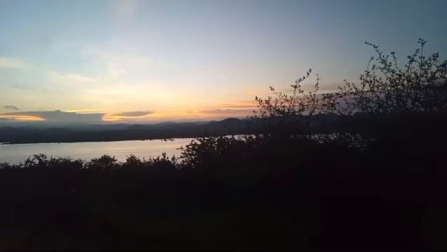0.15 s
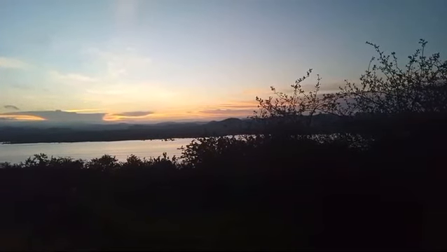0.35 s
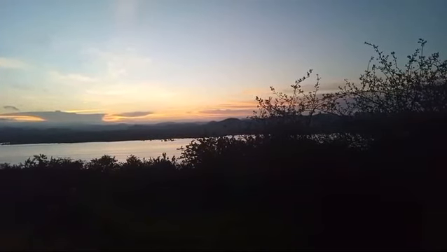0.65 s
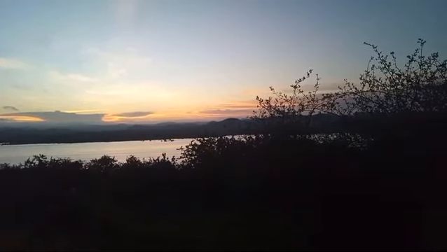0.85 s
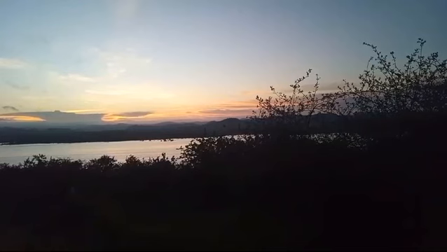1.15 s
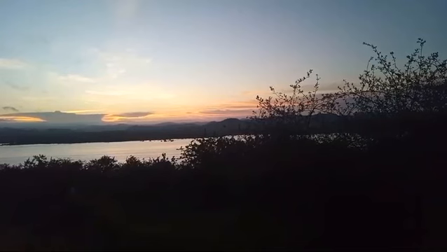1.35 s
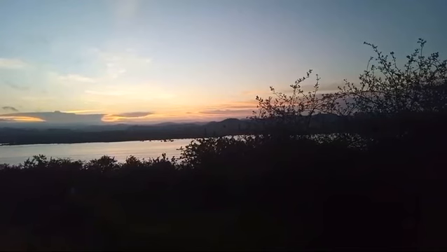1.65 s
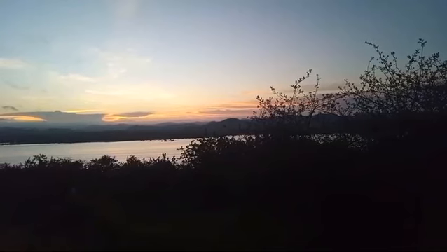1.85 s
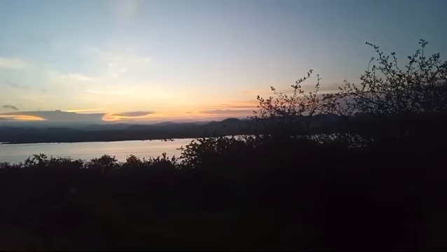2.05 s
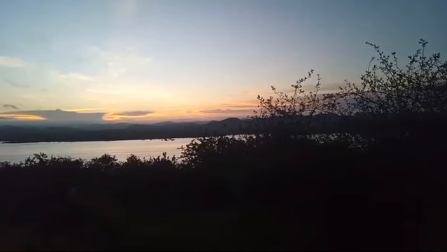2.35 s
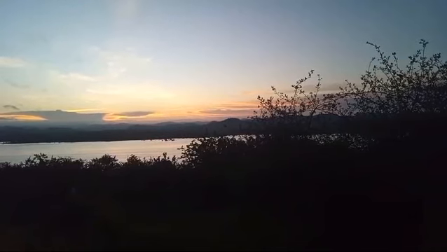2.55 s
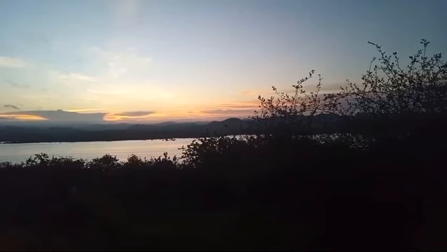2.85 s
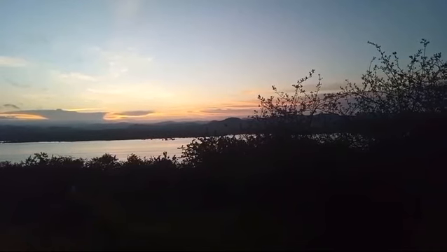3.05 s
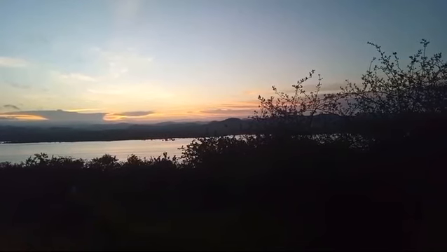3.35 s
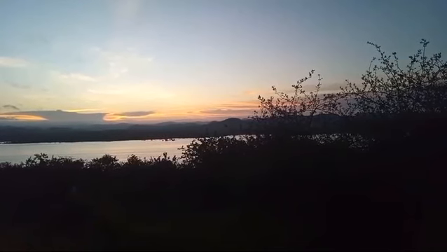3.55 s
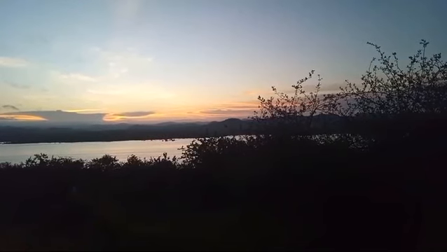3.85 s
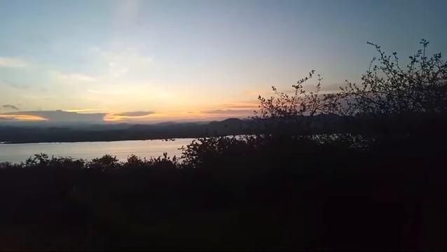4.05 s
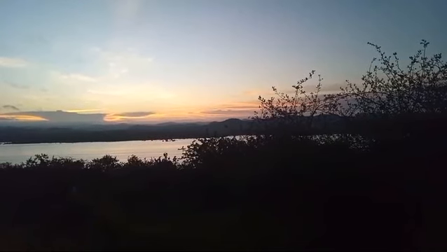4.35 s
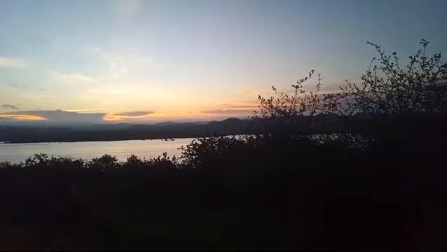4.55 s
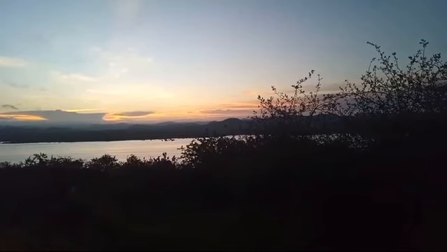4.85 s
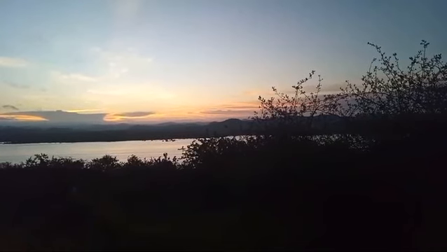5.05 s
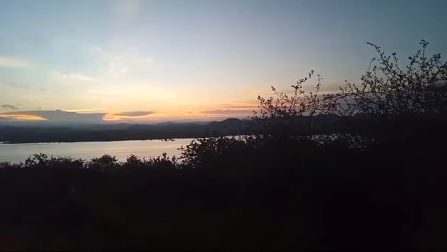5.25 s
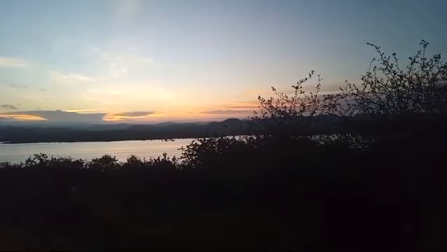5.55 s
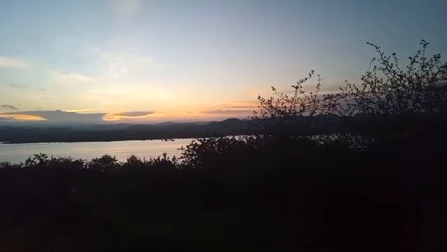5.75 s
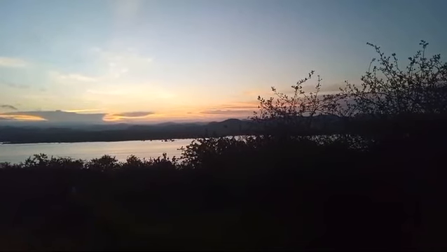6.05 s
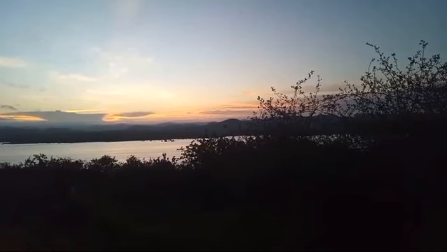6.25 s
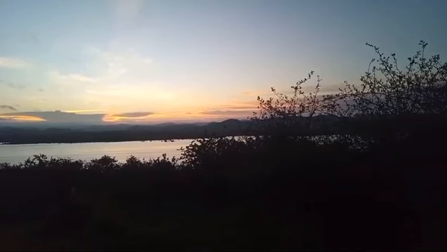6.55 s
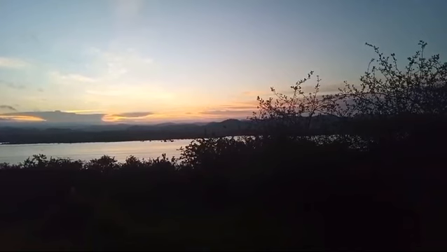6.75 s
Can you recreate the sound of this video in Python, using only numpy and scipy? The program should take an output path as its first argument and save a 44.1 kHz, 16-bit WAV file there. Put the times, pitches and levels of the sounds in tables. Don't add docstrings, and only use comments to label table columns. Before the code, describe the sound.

A small mono microphone on a bushy slope above a lake hears a dawn chorus, each call leaving a short scattered tail. At 0 s a near songbird finishes a falling whistle. From 0.3 to 1.25 s a fairly close rooster crows in broken, hoarse syllables, then holds a long note around 650-700 Hz, swelling, dipping, swelling again and cracking at 2.5 s. Birds thicken from 1.3 s: downward swoops, quick turns, low warbles, rasps and sharp chips, notably at 1.65 and 2.8 s. A faint rooster answers around 2.9-3.4 s, others fainter still. Two dull handling knocks fall at 3.7 and 3.9 s. A loud steep high whistle comes at 4.25 s, with thin high notes, then a lull. Chips, swoops and broad falling whistles return at 4.8-5.6 s. Softer low whistles thin out until 6.9 s over light wind, blurred distant chorus, low hum and a barely audible far lowing call.

```python
import sys
import numpy as np
from scipy import signal
from scipy.fft import rfft, irfft, next_fast_len
from scipy.io import wavfile
from scipy.ndimage import uniform_filter1d, map_coordinates

SR = 44100
rng = np.random.default_rng(int(sys.argv[2]) if len(sys.argv) > 2 else 0)


def gain_from_db(level_db):
    decades = np.asarray(level_db, float) / 20
    return 10 ** decades


def generate_wav(sig):
    pcm = np.round(np.clip(np.atleast_2d(sig).T, -1, 1) * 32767).astype(np.int16)
    wavfile.write(sys.argv[1], SR, pcm)


N = 304731

# (time [s], length [s], top [Hz], bottom [Hz], level [dB])
NEAR_FALLS = [
    (0, 0.055, 2424, 1504, -38.5),
    (5.093, 0.075, 3095, 1565, -35.5),
]
NEAR_ARCHES = [
    (5.195, .173, 2795, 1585, -41),
]
NEAR_RISES = [
    (.885, 0.1395, 7406, 6590, -52.5),
]
# (time [s], pitch [Hz], level [dB])
NEAR_EARLIER = [
    (-.06, 2547, -35),
    (-.03, 2874, -39.5),
    (.001, 2498, -36.5),
]
# (time [s], pitch [Hz], level [dB])
NEAR_PHRASES = [
    [(.842, 3050, -44), (.862, 2770, -42.5), (.88, 2200, -46), (.93, 2000, -45), (.995, 1600, -57)],
    [(1.652, 3250, -51), (1.672, 3400, -46.5), (1.7, 3270, -37.5), (1.724, 3040, -41.5),
     (1.742, 3170, -36.5), (1.75, 3200, -50)],
    [(1.733, 3530, -39), (1.742, 3724, -40.5), (1.752, 3760, -38), (1.763, 4170, -36.5), (1.785, 5220, -48),
     (1.8, 5280, -57), (1.85, 5170, -66)],
    [(2.525, 1600, -47), (2.61, 2546, -41.5), (2.626, 2200, -40.5), (2.64, 2550, -40), (2.652, 2100, -47.5),
     (2.675, 2744, -42), (2.7, 1720, -53.5), (2.73, 1680, -68)],
    [(3.283, 3310, -53), (3.312, 3113, -46), (3.328, 3450, -44), (3.345, 2958, -42), (3.358, 3970, -41),
     (3.375, 3170, -40), (3.545, 1712, -52)],
    [(4.243, 5300, -34), (4.262, 5350, -31), (4.288, 4460, -37.5), (4.305, 3250, -42), (4.325, 2806, -40.5),
     (4.35, 2600, -45), (4.362, 1890, -47.5)],
]


def near_bird():
    out = np.zeros(N)
    voice = dict(overtone_db=3, wet_db=-4, flutter_db=4.8)
    sing(out, NEAR_FALLS, lambda u: fall(u, drop_db=-24), **voice)
    sing(out, NEAR_ARCHES, lambda u: arch(u, drop_db=-13), **voice)
    sing(out, NEAR_RISES, lambda u: rise(u, drop_db=-9.5), **voice)
    sing_phrases(out, NEAR_PHRASES, overtone_db=3, wet_db=-8)
    sing_phrases(out, [NEAR_EARLIER], overtone_db=-10, wet_db=-3)
    return out


# (time [s], top [Hz], level [dB])
SWOOPS = [
    (1.341, 5215, -45),
    (3.043, 5196, -39),
    (5.047, 5255, -43),
    (5.565, 5094, -42.5),
]
# (time [s], pitch over top [ratio], level [dB])
SWOOP_SHAPE = [
    (0, .89, -19.5),
    (.016, 1, -2.5),
    (0.041, 0.97, 0),
    (0.114, .635, -12),
    (.143, .555, -11),
    (.165, .64, -16),
    (.18, .64, -28),
]


def swooping_bird():
    out = np.zeros(N)
    swoops = [[(s + t, top_hz * ratio, db + swell_db) for t, ratio, swell_db in SWOOP_SHAPE]
              for s, top_hz, db in SWOOPS]
    sing_phrases(out, swoops, overtone_db=-24, wet_db=-4)
    return out


# (time [s], length [s], top [Hz], bottom [Hz], level [dB])
ARCHES = [(1.82, 0.13, 2448, 1820, -48), (2.48, 0.04, 2094, 1690, -50.5), (3.625, 0.13, 2402, 1663, -52.5),
          (3.875, 0.055, 2250, 1760, -54.5), (5.452, 0.05, 2480, 1895, -50), (5.55, .12, 2486, 1900, -44.5),
          (6.405, 0.061, 2800, 2490, -77), (6.79, 0.11, 2936, 2440, -76.5)]
HELD = [
    (2.485, 0.027, 4710, 4340, -45.5),
    (2.682, 0.051, 4760, 4440, -56),
    (3.262, 0.03, 4790, 4730, -63),
    (3.543, 0.017, 2410, 2267, -49),
    (3.897, 0.034, 6100, 5900, -66),
    (1.858, 0.082, 4590, 4294, -49),
    (3.042, 0.021, 4830, 4690, -50.5),
    (4.785, 0.098, 2286, 2210, -76),
]
WARBLES = [
    (1.692, 0.073, 2485, 2050, -43.5),
    (2.054, 0.076, 2383, 1993, -44),
]
# (time [s], pitch [Hz], level [dB])
LOW_PHRASES = [
    [(5.778, 2470, -46), (5.79, 2360, -46.5), (5.812, 2060, -53.5), (5.84, 2340, -46), (5.852, 2200, -50),
     (5.868, 1840, -64)],
    [(5.905, 1720, -72), (5.935, 2166, -57), (5.98, 2198, -53), (6.01, 2170, -56), (6.025, 2060, -53.5),
     (6.055, 1820, -70)],
    [(6.195, 1600, -79), (6.218, 2010, -58), (6.232, 2100, -52.5), (6.255, 1794, -65.5),
     (6.285, 2044, -55.5), (6.3, 1945, -58), (6.315, 1800, -70)],
    [(6.348, 1960, -63), (6.367, 2305, -47), (6.382, 2090, -59), (6.395, 1790, -68), (6.43, 1620, -72)],
    [(2.175, 1690, -67), (2.205, 2136, -53), (2.27, 2140, -52), (2.3, 2080, -53), (2.325, 1850, -61)],
    [(3.292, 6450, -62), (3.32, 6200, -68), (3.355, 6950, -64), (3.385, 6350, -62), (3.425, 5600, -68)],
    [(6.14, 2700, -68), (6.148, 3420, -60), (6.165, 3350, -58), (6.185, 2650, -64)],
    [(3.322, 3040, -50), (3.345, 2953, -45.5), (3.372, 3020, -52)],
]


def low_bird():
    out = np.zeros(N)
    voice = dict(overtone_db=-23, wet_db=-8.5, flutter_db=3.5)
    sing(out, ARCHES, lambda u: arch(u, drop_db=-18.5), **voice)
    sing(out, HELD, lambda u: arch(u, drop_db=-20, lean=0.95, flat=0.28), **voice)
    sing(out, WARBLES, lambda u: warble(u, drop_db=-12.5), **voice)
    sing_phrases(out, LOW_PHRASES, overtone_db=-24, wet_db=-7)
    return out


# (time [s], pitch [Hz], level [dB])
HIGH_PHRASE = [
    (4.15, 6400, -68),
    (4.18, 7050, -57),
    (4.21, 7300, -53),
    (4.262, 6380, -46),
    (4.39, 7700, -55.5),
    (4.5, 7700, -73),
    (4.6, 7670, -76),
]


def high_bird():
    out = np.zeros(N)
    sing_phrases(out, [HIGH_PHRASE], overtone_db=14, wet_db=-4)
    return out


# (time [s], length [s], top [Hz], bottom [Hz], level [dB])
FALLS = [(1.765, 0.06, 3210, 1900, -60.5), (2.42, .035, 3700, 2700, -66), (2.1, 0.022, 4196, 3280, -61),
         (2.44, 0.016, 5600, 4700, -56), (2.453, .02, 4800, 3950, -48), (2.652, 0.038, 4180, 3350, -52.5),
         (3.105, 0.043, 2260, 2010, -72), (3.81, 0.066, 3620, 1920, -69), (5.03, 0.032, 2270, 1950, -68),
         (5.42, 0.059, 2896, 2000, -54), (3.357, 0.05, 2650, 2020, -60)]
RISES = [(.14, 0.33, 3590, 3100, -78.5), (2.063, 0.074, 5770, 4900, -52.5), (2.213, 0.08, 5780, 4850, -48),
         (2.373, 0.09, 5780, 4760, -49), (2.53, 0.073, 5740, 4550, -54.5),
         (2.738, 0.0292, 5400, 4400, -58.5), (3.963, .016, 9360, 6100, -65.5),
         (3.505, 0.015, 6920, 4500, -66.5), (3.3, 0.03, 5800, 4760, -64), (2.885, 0.045, 2920, 2550, -56.5),
         (2.945, 0.016, 5320, 4840, -54), (3.893, 0.021, 7560, 6560, -62.5),
         (3.293, 0.043, 2720, 1950, -61), (1.843, 0.024, 4260, 2700, -51), (4.47, 0.044, 6020, 5640, -78),
         (4.895, 0.059, 2944, 2615, -53)]
# (time [s], pitch [Hz], level [dB])
FAR_PHRASES = [
    [(1.482, 2200, -52), (1.505, 2650, -49), (1.525, 3150, -52), (1.548, 2400, -48), (1.565, 2216, -48.5),
     (1.615, 2183, -75)],
    [(4.125, 4170, -59), (4.135, 4880, -61.5), (4.165, 4850, -63), (4.175, 5440, -58), (4.19, 6200, -68)],
    [(4.188, 4150, -55), (4.198, 4730, -61), (4.213, 4900, -56), (4.24, 6300, -53)],
    [(4.2, 3080, -69), (4.22, 3186, -63), (4.235, 2740, -73), (4.26, 2580, -83)],
    [(2.88, 4240, -61.5), (2.905, 4040, -57), (2.93, 3900, -59)],
    [(3.52, 4180, -49), (3.528, 4680, -47.5), (3.54, 3924, -51), (3.56, 4080, -52), (3.575, 3820, -51),
     (3.592, 3750, -56), (3.615, 2720, -61.5)],
    [(3.915, 2070, -73), (3.95, 1485, -82), (4.005, 2074, -68.5), (4.07, 2103, -53), (4.1, 2050, -64.5),
     (4.125, 1670, -70)],
    [(3.97, 2590, -83), (4.0, 3170, -83), (4.03, 3355, -73), (4.09, 3430, -73), (4.17, 3330, -69)],
    [(4.255, 1604, -83), (4.285, 2080, -68), (4.312, 1856, -72), (4.35, 1890, -66)],
    [(4.405, 2060, -74), (4.42, 2246, -63), (4.45, 1797, -71), (4.53, 1393, -83)],
    [(2.557, 2950, -62), (2.58, 2880, -60), (2.595, 3380, -60), (2.62, 3300, -66)],
    [(4.165, 2750, -76), (4.19, 3470, -72), (4.2, 3400, -80)],
]


def far_birds():
    out = np.zeros(N)
    voice = dict(overtone_db=-12.5, wet_db=-1.5, flutter_db=5.7)
    sing(out, FALLS, lambda u: fall(u, drop_db=-4), **voice)
    sing(out, RISES, lambda u: rise(u, drop_db=-9), **voice)
    sing_phrases(out, FAR_PHRASES, overtone_db=-24, wet_db=-2)
    return out


# (time [s], length [s], top [Hz], bottom [Hz], level [dB])
HOOKS = [
    (1.212, 0.057, 3757, 2655, -59),
    (2.912, .052, 3820, 2780, -50.5),
    (4.928, 0.06, 3800, 2680, -52.5),
    (5.44, 0.045, 3744, 2720, -52.5),
]
PLATEAUS = [
    (1.997, 0.07, 3695, 2603, -58),
    (2.125, 0.073, 3730, 2800, -58.5),
    (2.253, 0.075, 3790, 2610, -60.5),
]
DIVES = [
    (3.976, 0.043, 9450, 3980, -58.5),
    (4.553, 0.049, 9600, 3920, -64),
]


def hidden_birds():
    out = np.zeros(N)
    voice = dict(overtone_db=-24, wet_db=2, flutter_db=4.4)
    sing(out, HOOKS, lambda u: hook(u, drop_db=-23.5), **voice)
    sing(out, PLATEAUS, lambda u: arch(u, drop_db=-7, lean=0.6, flat=0.49), **voice)
    sing(out, DIVES, lambda u: fall(u, drop_db=-13, bend=0.93), **voice)
    return out


# (time [s], peak level [dB], start [Hz])
CHIPS = [
    (1.1322, -46, 6190),
    (1.6435, -38.5, 6190),
    (2.831, -35.5, 5980),
    (4.845, -37.5, 6540),
    (5.3485, -41, 6630),
]


def chips():
    out, t = np.zeros(N), np.arange(int(0.038 * SR)) / SR
    for s, peak_db, top_hz in CHIPS:
        hz = np.interp(t, [0, 0.012, 0.018, 0.035], [top_hz, 4050, 4800, 5250])
        db = peak_db - 7 - 250 * np.minimum(t, 0.02)
        add(out, s, whistle(hz, db, overtone_db=-30, flutter_db=2), wet_db=2)
    return out


# (time [s], length [s], start [Hz], end [Hz], level [dB], overtones [dB])
RASPS = [
    (1.767, 0.059, 5310, 4910, -44.5, -11),
    (1.833, 0.034, 5090, 6270, -42.5, -13),
    (1.79, .08, 6900, 7100, -57.5, -30),
    (3.31, .1, 5590, 5020, -68, -21.5),
    (3.768, .07, 6100, 4350, -52.5, -36),
    (3.734, 0.088, 5340, 5118, -55, -32),
    (4.248, 0.12, 5420, 4590, -66, 6),
]


def rasps():
    out = np.zeros(N)
    for s, length_s, start_hz, end_hz, db, overtone_db in RASPS:
        n = int(length_s * SR)
        shake = 1 + 0.15 * np.tanh(wobble(n, 700))
        phase = turns(np.linspace(start_hz, end_hz, n) * shake)
        tone = np.sin(phase) + gain_from_db(overtone_db) * (np.sin(2 * phase) + 0.4 * np.sin(3 * phase))
        level = gain_from_db(db + 3 * np.tanh(wobble(n, 250)))
        add(out, s, faded(level * tone, 0.3 * length_s), wet_db=-3)
    return out


def sing(out, notes, shape, overtone_db, wet_db, flutter_db):
    for s, length_s, top_hz, bottom_hz, db in notes:
        height, swell_db = shape(np.linspace(0, 1, int(length_s * SR)))
        hz = bottom_hz + (top_hz - bottom_hz) * height
        add(out, s, whistle(hz, db + swell_db, overtone_db, flutter_db), wet_db)


def sing_phrases(out, phrases, overtone_db, wet_db):
    for phrase in phrases:
        s, (hz, db) = columns(phrase, round_s=0.0026)
        add(out, s, whistle(hz, db, overtone_db, flutter_db=4.5), wet_db)


# (frequency [Hz], level [dB])
OVERTONE_COLOUR = [(3000, -21), (5800, -45.5), (6450, -33), (7200, -44.5), (8300, -35.5), (10500, -22.5),
                   (12500, -32.5), (15000, -31)]


def whistle(hz, db, overtone_db, flutter_db):
    n = len(hz)
    phase = turns(hz * (1 + 0.0075 * wobble(n, 140)))
    tone = np.sin(phase)
    for k in range(2, 8):
        effort_db = 0.5 * (db + 42) + 5 * wobble(n, 110) - 2
        line_db = overtone_db + effort_db + along(OVERTONE_COLOUR, k * hz) - 2.1 * abs(k - 4.2)
        tone += gain_from_db(line_db) * (k * hz < 15700) * np.sin(k * phase)
    level = np.sqrt(2) * gain_from_db(db + flutter_db * np.tanh(wobble(n, 150)))
    return faded(level * tone, 0.005)


def fall(u, drop_db, bend=1.5):
    return (1 - u) ** bend, drop_db * u


def rise(u, drop_db):
    return np.sin(0.6 * np.pi * u), drop_db * ((u - 0.7) / 0.81) ** 2


def arch(u, drop_db, lean=0.85, flat=1.2):
    height = np.abs(np.sin(np.pi * u ** lean)) ** flat
    return height, drop_db * (1 - height)


def warble(u, drop_db):
    height = 0.5 + 0.5 * np.cos(2 * np.pi * (1.5 * u - 0.1))
    return height, drop_db * (1 - height)


def hook(u, drop_db):
    return np.abs(np.sin(np.pi * u ** 0.5)) ** 0.97, drop_db * ((u - .5) / .5) ** 2


def close_rooster():
    out = np.zeros(N)
    s, controls = columns(crow_controls(), round_s=0.0088)
    voice = crow(*controls)
    add(out, s, voice, wet_db=-7)
    hill_s, hill_db = 0.18, -29
    add(out, s + hill_s, gain_from_db(hill_db) * uniform_filter1d(voice, size=12), wet_db=6.5)
    return out


# (time [s], length [s], level [dB], hoarseness [0-1], beak [dB])
SYLLABLES = [(0.302, 0.044, -57.5, 0.74, 1.5), (0.367, 0.1, -50, 0.55, 2.5), (0.466, 0.1, -58, 0.64, -14),
             (0.566, 0.05, -43.5, 0.19, 5), (0.613, 0.048, -51, 0.4, -7), (0.664, 0.0449, -43, 0.28, 0),
             (0.718, 0.055, -51.5, 0.58, 7), (0.776, .028, -44.5, 0.35, 15.5), (.803, 0.21, -46, 0.33, -6),
             (1.031, 0.093, -48, 0.71, 9), (1.136, 0.043, -56, 0.96, -2), (1.187, 0.074, -49, 0.71, 5)]
# (time [s], pitch [Hz])
OPENING_HZ = [(.303, 510), (.346, 510), (.37, 659), (.455, 626), (.475, 555), (.555, 551), (.568, 665.5),
              (.605, 713), (.63, 735), (.672, 736), (.705, 685), (.722, 655), (.762, 702), (.78, 622.5),
              (.8, 663), (.812, 690.7), (1.0, 700.3), (1.26, 661.7)]
# (time [s], pitch [Hz], level [dB], chest [dB], beak [dB])
LONG_NOTE = [
    (1.27, 657, -45, 0, 3.5),
    (1.33, 660, -48, -1.5, 2.5),
    (1.47, 701.8, -47.5, -2, -9),
    (1.602, 703, -42, -8, -22),
    (1.781, 690, -59.5, 6, -5),
    (1.92, 665.8, -54, -5.5, -5),
    (2.18, 647, -46, -22, -2.5),
    (2.38, 629.2, -48.5, -2, 6),
    (2.451, 606, -57, -14.5, 13),
]


def crow_controls():
    attack_s, fall_s, release_s = 0.00786, 0.0152, 0.048
    sag, gap_db, release_db = 0.97, -4.5, -24
    gap_hoarse, clear_hoarse, end_hoarse = 0.8, 0.04, 0.6
    rows = []
    for s, length_s, db, hoarse, beak_db in SYLLABLES:
        shape = [(0, sag, gap_db, gap_hoarse), (attack_s, 1, 0, hoarse),
                 (length_s - fall_s, 1, 0, hoarse), (length_s, sag, gap_db, gap_hoarse)]
        for t, ratio, dip_db, rough in shape:
            hz = ratio * np.interp(s + t, *np.transpose(OPENING_HZ))
            rows.append((s + t, hz, db + dip_db, rough, 3.5, beak_db))
    s, hz, db, chest_db, beak_db = np.transpose(LONG_NOTE)
    hoarse = np.r_[end_hoarse - 0.2, np.full(len(s) - 2, clear_hoarse), end_hoarse]
    rows += zip(s, hz, db + 1.5, hoarse, chest_db, beak_db)
    release = (s[-1] + release_s, sag * hz[-1], db[-1] + release_db, end_hoarse, chest_db[-1], 0)
    return sorted(rows) + [release]


# (frequency [Hz], level [dB])
THROAT = [(500, -21), (610, -5), (680, -7.5), (1350, 1.5), (2000, -7), (2450, -30), (2560, -14),
          (2670, -6.5), (2800, -15.5), (2900, -28), (3400, -44), (4100, -36), (4650, -20), (5400, -33),
          (6000, -44), (6650, -36), (7600, -58), (9500, -35.5), (15000, -54)]
# (frequency [Hz], density [dB/Hz])
BREATH = [(450, -24.5), (550, -11.5), (1080, -14.5), (1400, 6), (1650, -11), (1950, 6), (2400, -28),
          (3500, -23.5), (4200, -13), (6300, -20.5)]


def crow(hz, db, hoarse, chest_db, beak_db):
    n = len(hz)
    phase = turns(hz * (1 + (0.002 + 0.012 * hoarse) * wobble(n, 30)))
    shake = turns(hz * 0.026 * hoarse * wobble(n, 130))
    clear_db = np.clip((db + 49.5) * (1 - hoarse), 0, 10)
    broken = np.clip(hoarse / 0.11, 0, 1)
    tone = np.zeros(n)
    for k in range(1, 23):
        line_db = (3.5 * wobble(n, 7) + 4.5 * wobble(n, 35)) * (k > 3)
        line_db += (2 + 6 * hoarse) * np.tanh(wobble(n, 55))
        line_db += chest_db * (k == 1) + beak_db * (k == 3)
        line_db += broken * (13 * (k == 6) + 6 * (k == 7) - 12 * (k > 8))
        line_db -= (k > 3) * clear_db
        angle = k * phase + min(k, 3) * shake + rng.uniform(0, 2 * np.pi)
        tone += gain_from_db(along(THROAT, k * hz) + line_db) * np.sin(angle)
    second = np.sin(turns(1080 * (1 + 0.0231 * wobble(n, 60))))
    second *= gain_from_db(-1 + 5 * np.tanh(wobble(n, 40)))
    breath = coloured(n, BREATH) * gain_from_db(3 * np.tanh(wobble(n, 60)))
    voice = tone + 1.5 * hoarse ** 3 * second + 0.9 * hoarse * breath
    ragged_pulses = gain_from_db(4 * hoarse * np.tanh(wobble(n, 260)))
    return faded(gain_from_db(db) * voice * ragged_pulses, 0.004)


# (time [s], pitch [Hz], level [dB])
FAR_CROW = [
    (2.84, 747, -87),
    (2.89, 810, -62.5),
    (2.93, 765, -74),
    (3.01, 767, -78),
    (3.05, 821, -65),
    (3.1, 785, -70),
    (3.25, 785, -65.5),
    (3.47, 754, -82.5),
]
LOWING = [
    (5.9, 445, -94),
    (6.1, 440, -81),
    (6.4, 451, -83),
    (6.7, 463, -90),
    (6.91, 470, -73),
]
# (time [s], pitch [Hz], level [dB])
FAINT_CROWS = [
    [(2.85, 637, -87), (3.0, 625, -86), (3.15, 617, -80), (3.33, 610, -85)],
    [(3.7, 625, -87), (4.0, 620, -94.5), (4.3, 621, -87), (4.45, 610, -90)],
    [(3.5, 766, -90), (3.8, 765, -89), (4.1, 768, -88.5), (4.4, 777, -91)],
    [(4.6, 632.5, -90), (4.92, 624, -85.5), (5.05, 606, -91)],
    [(5.93, 648, -90), (5.99, 629, -82.5), (6.18, 606, -89)],
]
FAINT_SECOND_DB = [
    0,
    -15,
    1,
    -12,
    -12,
]


def far_roosters():
    out = np.zeros(N)
    calls = [(FAR_CROW, -22), (LOWING, -20), *zip(FAINT_CROWS, FAINT_SECOND_DB)]
    for rows, second_db in calls:
        s, (hz, db) = columns(rows, round_s=0.033)
        n = len(hz)
        phase = turns(hz * (1 + 0.008 * wobble(n, 25)))
        tone = np.sin(phase) + gain_from_db(second_db) * np.sin(2 * phase)
        level = np.sqrt(2) * gain_from_db(db + 4 * wobble(n, 22))
        add(out, s, faded(level * tone, 0.03), wet_db=-6)
    return out


# (time [s], frequency [Hz], peak level [dB])
KNOCKS = [
    (3.718, 517, -46),
    (3.718, 308, -45.5),
    (3.718, 170, -49),
    (3.896, 264, -30.5),
]


def knocks():
    out, t = np.zeros(N), np.arange(N) / SR
    for s, hz, db in KNOCKS:
        u = np.clip(t - s, 0, None)
        onset = 1 - np.exp(-u / 0.0041)
        out += gain_from_db(db - 60 * u / 0.023) * onset * np.sin(2 * np.pi * hz * u)
    return out


# (time [s], level [dB])
WIND = [
    (0, -84),
    (1.25, -84.5),
    (6.91, -87),
]
# (time [s], length [s], level [dB])
GUSTS = [(0.623, 0.097, -48.5), (0.852, 0.06, -52), (0.935, 0.078, -62), (.02, 0.19, -68.5),
         (1.122, .12, -79), (1.373, 0.12, -68.5), (2.88, 0.055, -81), (3.5, 0.36, -69),
         (4.426, 0.062, -69.5), (5.157, 0.043, -72), (5.635, 0.083, -65.5)]


def wind():
    t = np.arange(N) / SR
    gain = gain_from_db(np.interp(t, *np.transpose(WIND)) + 3.4 * wobble(N, 6))
    for s, length_s, db in GUSTS:
        gain += gain_from_db(db) * np.sin(np.pi * np.clip((t - s) / length_s, 0, 1))
    return gain * coloured(N, [(28, -36), (45, -24), (65, -5), (95, -13.5), (130, -14)])


# (frequency [Hz], density [dB/Hz])
AIR = [(90, -2.5), (125, -3.5), (155, -9), (360, -14.5), (700, -21), (1000, -27.5), (3500, -24.5),
       (5300, -15), (7500, -42.5), (10600, -39), (12500, -37.5), (15000, -44), (15700, -23)]
# (time [s], level [dB])
AIR_DB = [
    (0, -72.5),
    (2.9, -69),
    (3.698, -70.5),
    (4.7, -72),
    (6.1, -70.5),
    (6.6, -72),
]


def air():
    z = signal.stft(coloured(N, AIR), nperseg=512)[2]
    patches = uniform_filter1d(rng.standard_normal(z.shape), 7, 0)
    patches = unit(uniform_filter1d(patches, 12, 1))
    hiss = unit(signal.istft(z * gain_from_db(2 * patches), nperseg=512)[1][:N])
    level_db = np.interp(np.arange(N) / SR, *np.transpose(AIR_DB))
    return gain_from_db(level_db + wobble(N, 3.95)) * hiss


def hum():
    level = gain_from_db(-82.5 + 6.6 * wobble(N, 11))
    return level * np.sin(turns(117 + 4 * wobble(N, 11)))


# (frequency [Hz], t60 [s])
BUSHES = [
    (2000, 0.26),
    (5000, 0.26),
    (10000, 0.22),
]


def add(out, s, x, wet_db):
    hz, t, z = signal.stft(rng.standard_normal(SR // 3), SR, nperseg=128)
    decay = gain_from_db(-60 * t / along(BUSHES, hz)[:, None])
    tail = signal.istft(z * decay, SR, nperseg=128)[1]
    tail *= 1 - np.exp(-np.arange(len(tail)) / (0.0014 * SR))
    tail *= gain_from_db(3.5 * wobble(len(tail), 250))
    y = gain_from_db(wet_db) * signal.fftconvolve(x, tail / np.linalg.norm(tail))
    y[:len(x)] += x
    y = y[max(0, -round(s * SR)):]
    room = out[max(0, round(s * SR)):][:len(y)]
    room += y[:len(room)]


def unit(x):
    return x / np.sqrt(np.mean(x ** 2) + 1e-20)


def turns(hz):
    return 2 * np.pi * np.cumsum(hz) / SR


def along(points, hz):
    f, v = np.transpose(points)
    return np.interp(np.log(hz + 1), np.log(f + 1), v)


def wobble(n, rate):
    at = np.arange(0, n + 8, 8)
    knots = rng.standard_normal(int(n * rate / SR) + 4)
    return np.interp(np.arange(n), at, map_coordinates(knots, [at * rate / SR]))


def columns(rows, round_s):
    s, *cols = np.transpose(rows)
    t = np.arange(s[0], s[-1], 1 / SR)
    width = max(1, int(round_s * SR))
    return s[0], [uniform_filter1d(np.interp(t, s, c), width, mode="nearest") for c in cols]


def faded(x, edge_s):
    t = np.arange(len(x)) / SR
    return x * np.clip(np.minimum(t, t[::-1]) / edge_s, 0, 1)


def coloured(n, spectrum):
    m = next_fast_len(n + 4096)
    closed = [(spectrum[0][0] * 0.7, -120), *spectrum, (spectrum[-1][0] * 1.02, -120)]
    gain = gain_from_db(along(closed, np.fft.rfftfreq(m, 1 / SR)))
    return unit(irfft(rfft(rng.standard_normal(m)) * gain, m)[:n])


def scene():
    birds = near_bird() + swooping_bird() + low_bird() + high_bird() + far_birds() + hidden_birds()
    birds += chips() + rasps()
    roosters = close_rooster() + far_roosters()
    background = knocks() + wind() + air() + hum()
    return (birds + roosters + background)[None]


def band_limit(x):
    return signal.sosfilt(signal.butter(12, 16490, fs=SR, output="sos"), x)


def record(dry):
    return band_limit(dry)


dry = scene()
out = record(dry)
generate_wav(out)
```